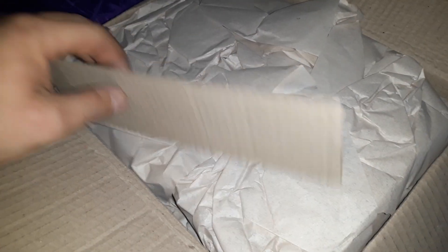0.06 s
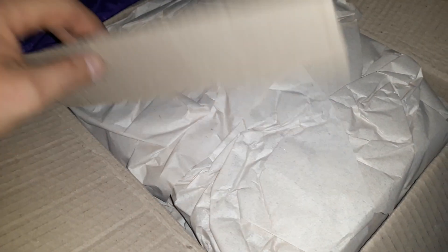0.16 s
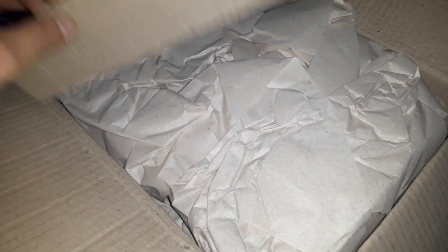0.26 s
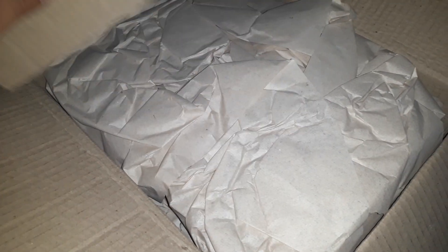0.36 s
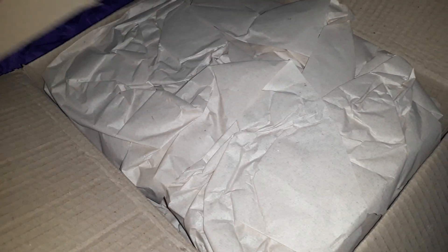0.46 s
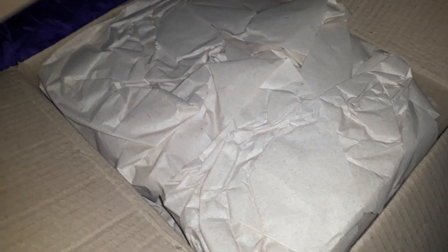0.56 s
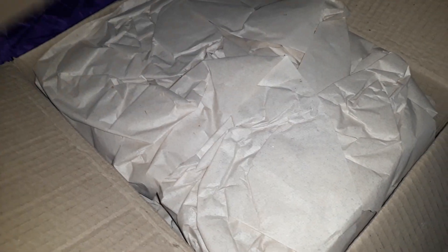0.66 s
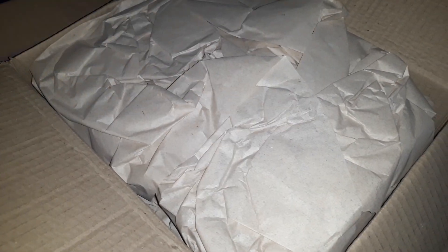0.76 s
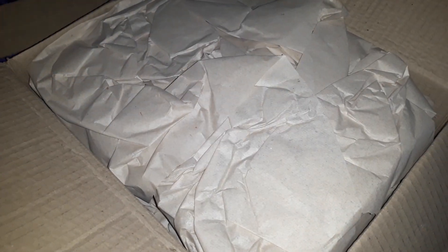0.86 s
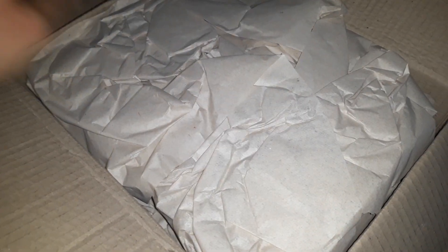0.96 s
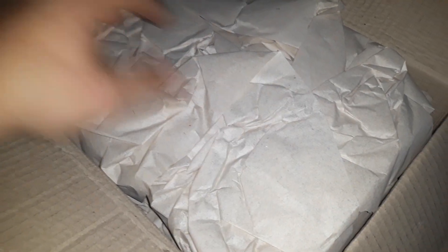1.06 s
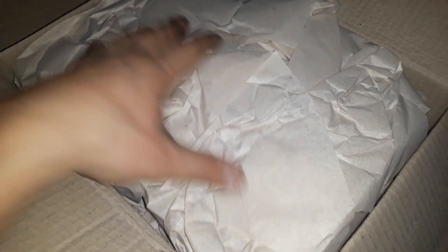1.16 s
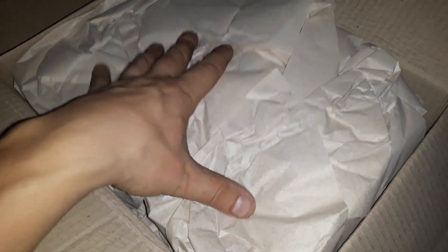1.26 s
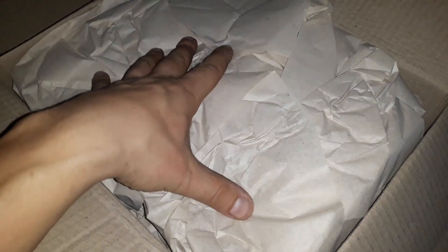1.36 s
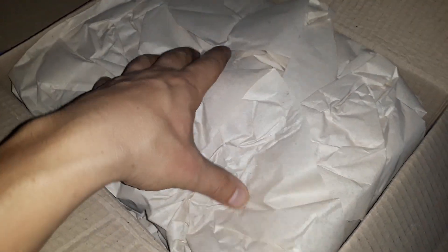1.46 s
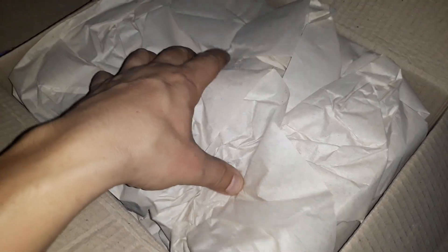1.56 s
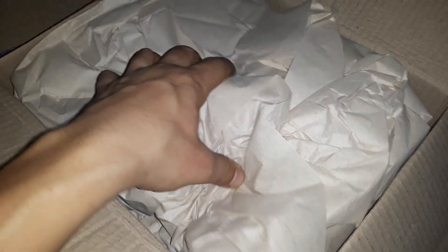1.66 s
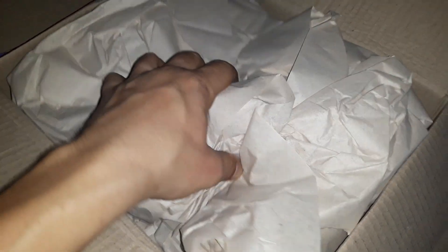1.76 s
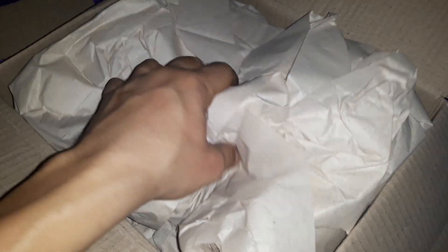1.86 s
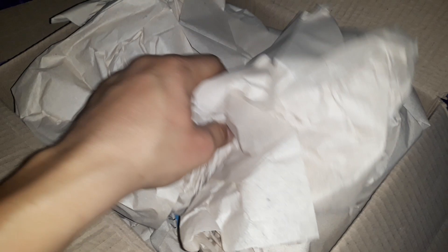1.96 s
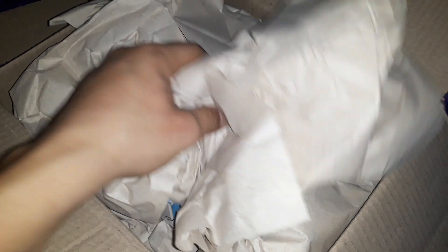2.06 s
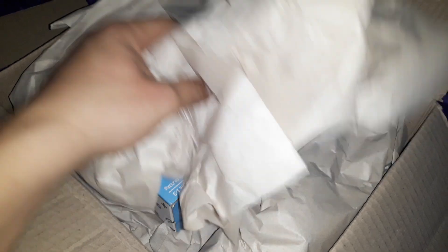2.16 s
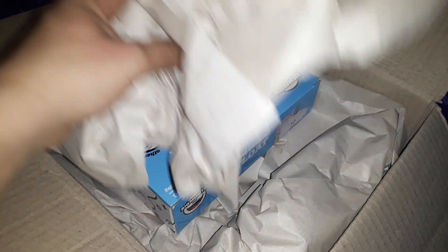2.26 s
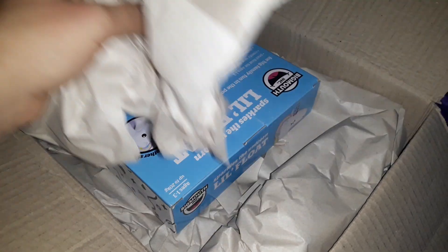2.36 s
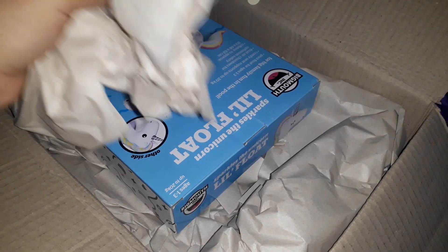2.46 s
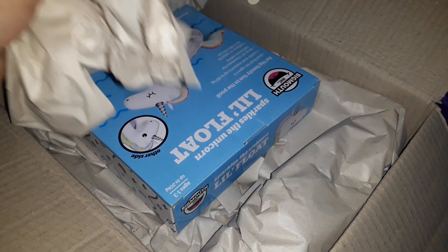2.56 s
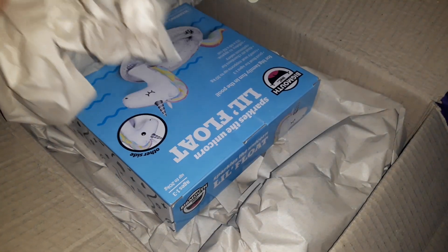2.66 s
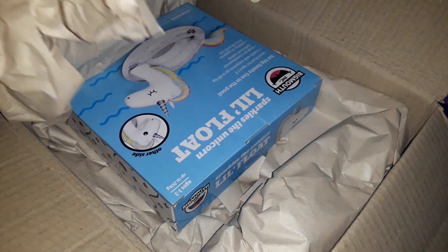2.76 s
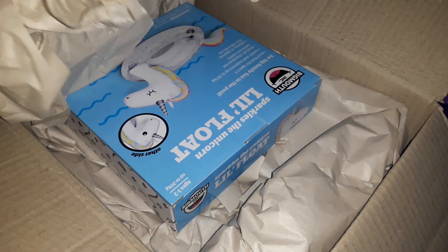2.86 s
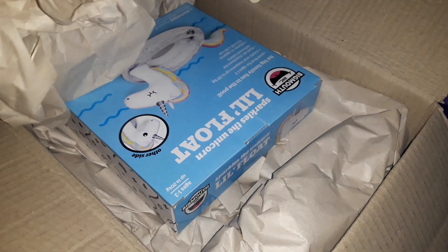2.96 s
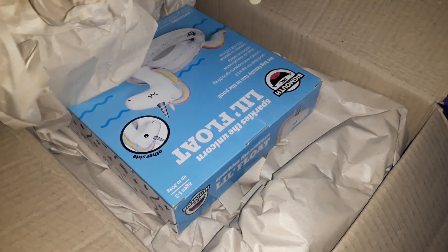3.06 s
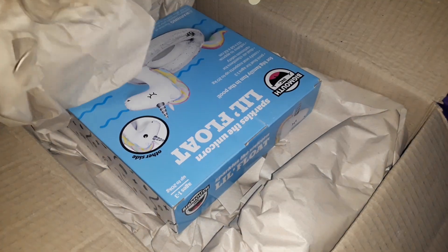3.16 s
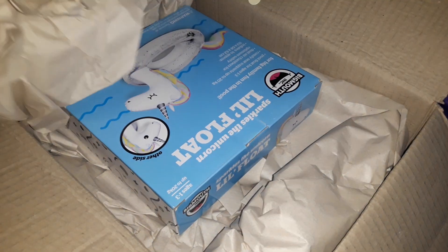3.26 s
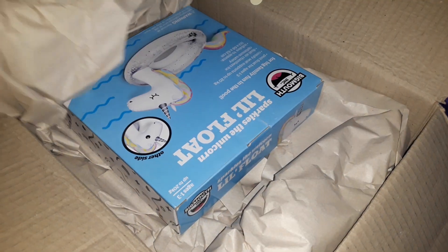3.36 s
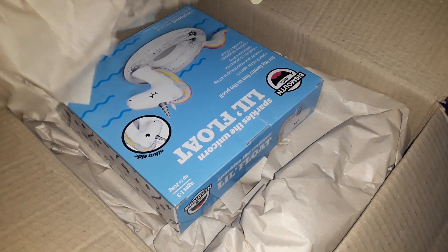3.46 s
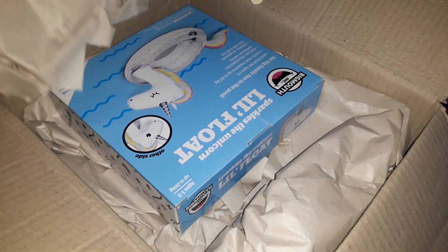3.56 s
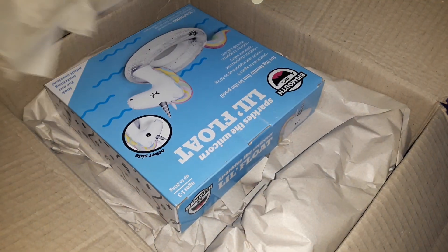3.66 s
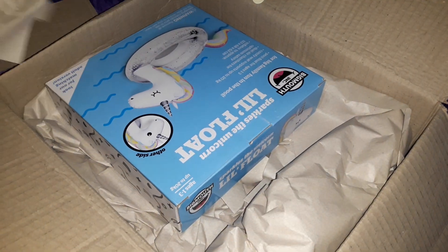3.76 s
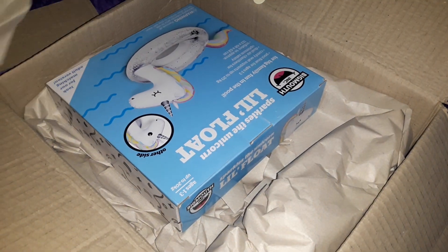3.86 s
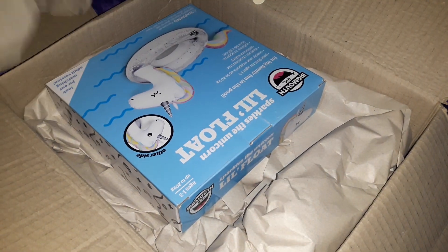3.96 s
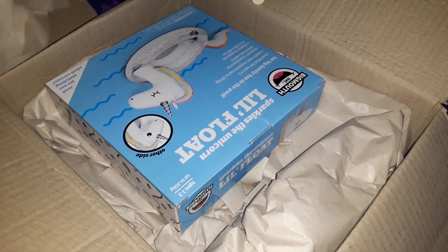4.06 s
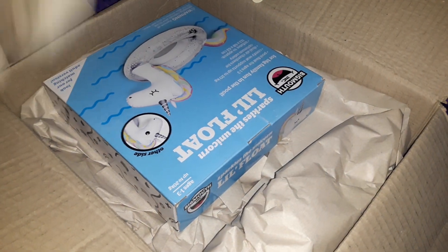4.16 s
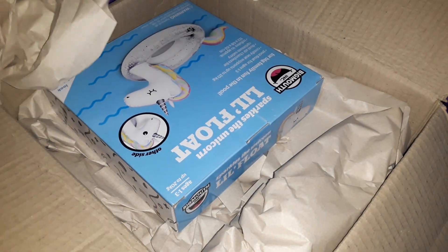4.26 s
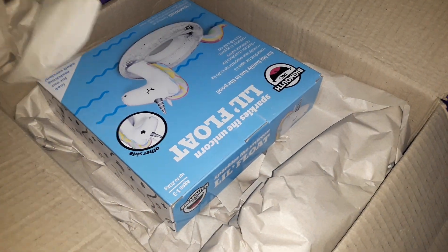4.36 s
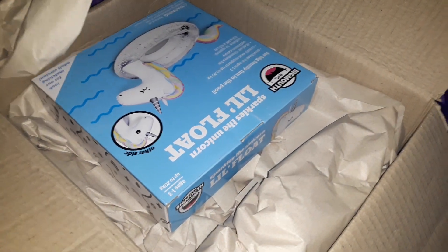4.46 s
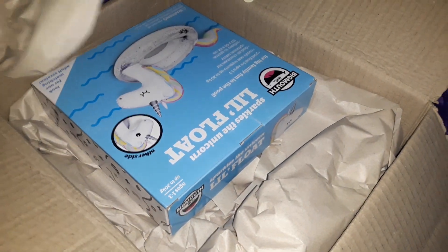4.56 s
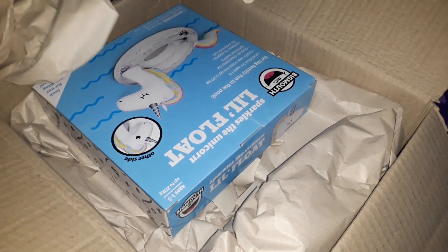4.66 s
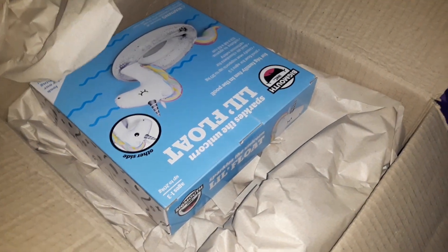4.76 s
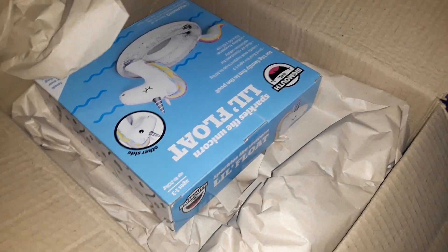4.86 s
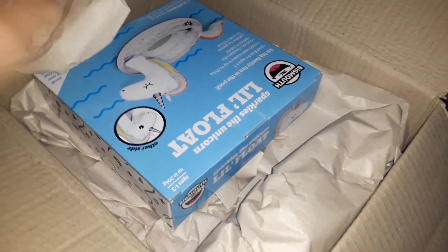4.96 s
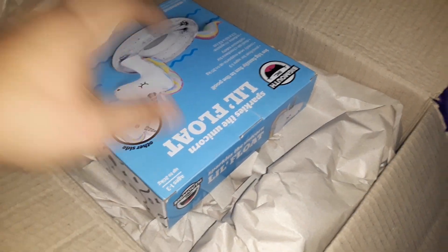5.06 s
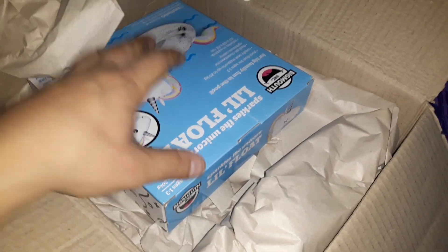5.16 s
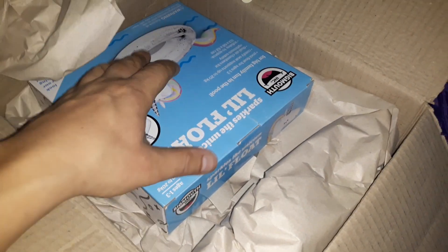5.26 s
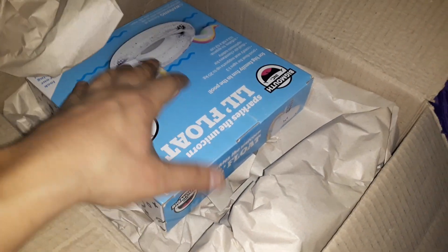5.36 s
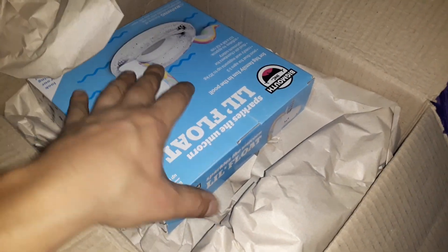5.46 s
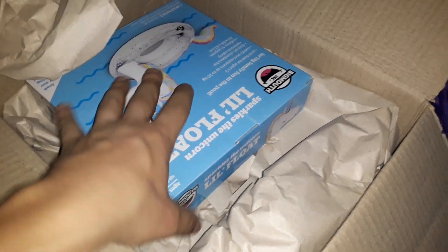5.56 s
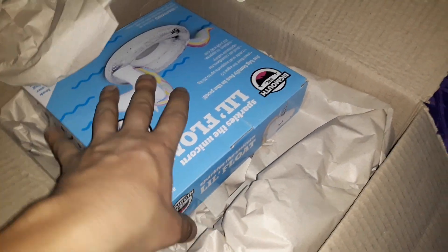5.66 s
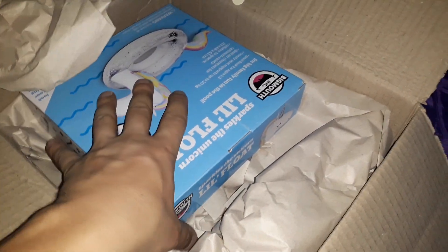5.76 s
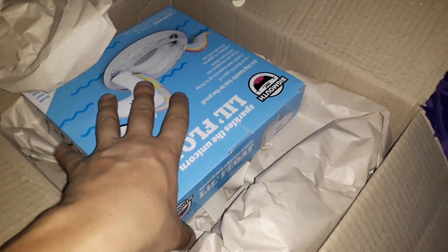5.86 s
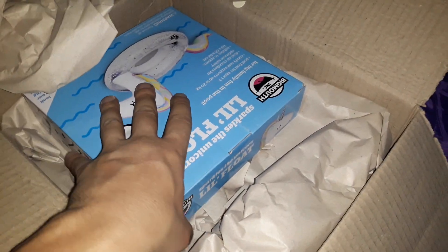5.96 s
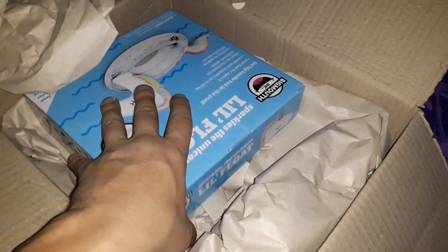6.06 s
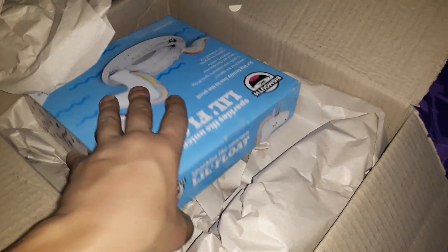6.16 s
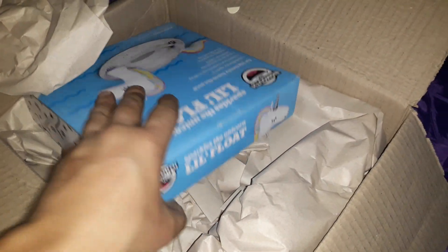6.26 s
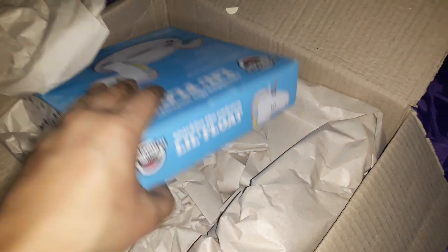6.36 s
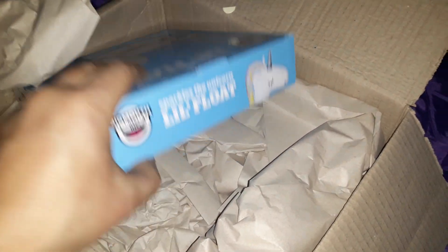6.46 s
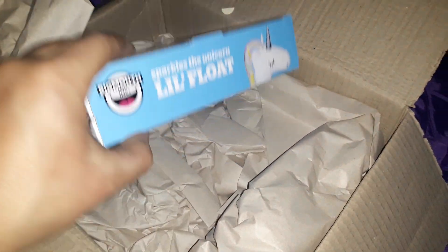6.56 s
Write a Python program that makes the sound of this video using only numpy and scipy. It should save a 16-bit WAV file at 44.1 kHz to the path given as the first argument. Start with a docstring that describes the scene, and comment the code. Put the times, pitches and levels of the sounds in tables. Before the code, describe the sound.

Close up in a small quiet room, a cardboard strip scrapes out of a box and lands with a hollow thud. After a pause, a hand crumples and pulls stiff packing paper in a long, loud rustle full of popping creases and dull box bumps. A last strong crunch fades, then fingers rub a carton softly and drag it out through the paper.

```python
"""Packing paper pulled from a cardboard box

Close microphone in a small room: crumpled paper is pushed aside and pulled out of a cardboard box.
Noise grains and short ticks make the creases buckle; rougher noise makes sheets slide and faces flap.
Single creases pop, the wad bumps and rubs the box, and a tossed strip lands on decaying modes.
At the end a carton is dragged out of the paper; a quiet background with a low hum lies behind it all."""
import sys
import numpy as np
from scipy import signal
from scipy.fft import rfft, irfft, next_fast_len
from scipy.io import wavfile
from scipy.ndimage import uniform_filter1d, map_coordinates

SR = 44100
rng = np.random.default_rng(int(sys.argv[2]) if len(sys.argv) > 2 else 0)


def digitize_waveform(pressure):
    """Quantize a signal to 16-bit integers and store it at the path in sys.argv[1].

    Rows of a 2-D input are taken as channels; values are limited to [-1, 1].
    """
    field = np.atleast_2d(pressure).T
    bounded = np.clip(field, -1, 1)
    quanta = np.round(bounded * 32767).astype(np.int16)
    wavfile.write(sys.argv[1], SR, quanta)


N = 291501  # length in samples

# separate strokes of the hand: the strip scrapes out, the paper springs back and settles, the hand
# presses in, the wad is shoved aside, fingers slide over the carton and tip it
# columns: surface, start_s, rise_s, hold_s, fade_t60_s, crinkle_db, flapping_rel_db, hiss_rel_db
HAND_STROKES = [("strip", 0, 0.0013, 0.025, 0.21, -41, -8, -2),
                ("strip", 0.045, 0.018, 0.082, 0.18, -39, -5.5, -2.7),
                ("paper", 0.14, .01, .02, 0.44, -49.5, -8.5, -4),
                ("settling paper", 0.23, .035, 0.044, 0.48, -55, -19, -4.5),
                ("settling paper", 0.455, 0.026, .01, 0.23, -64, -20, -2),
                ("settling paper", 0.587, 0.032, .04, .15, -66, -15, -0.89),
                ("paper", 1.2117, 0.034, 0.091, 0.36, -36, -7.5, -6),
                ("paper", 3.79, 0.021, 0.18, 0.33, -47.5, -6, -9.5),
                ("paper", 3.968, 0.18, 0.091, 0.79, -24, -6.5, -6),
                ("paper", 4.29, 0.06, 0.026, 0.54, -27, -6, -7.5),
                ("paper", 4.473, .13, 0.13, 0.73, -33, -7, -6.5),
                ("paper", 4.92, 0.048, 0.032, 0.13, -48.5, -7.5, -7),
                ("carton", 5.24, 0.033, 0.0091, 0.18, -50, -3, 3.02),
                ("carton", 5.41, 0.026, 0.046, 0.26, -48, -2.5, -5),
                ("carton", 5.615, 0.032, 0.056, 0.31, -46.5, -5.5, 0),
                ("carton", 5.77, 0.022, 0.042, .15, -47, -11, -14),
                ("carton", 5.9, 0.011, 0.1, .35, -47, -16, -10)]
# the wad gathered and pulled out in one long movement: time_s, crinkle_db
PULL_EFFORT = [(1.41, -46), (1.48, -30), (1.65, -31), (1.73, -25), (1.88, -28), (2.0, -23.5), (2.01, -28),
               (2.35, -35.5), (2.82, -38.5), (3.13, -31), (3.15, -35), (3.43, -32), (3.53, -28),
               (3.54, -35), (3.69, -34.5), (3.78, -45)]
# the carton dragged out of its bed of paper: time_s, crinkle_db
DRAG_EFFORT = [(5.27, -52.5), (5.56, -52.5), (5.87, -50), (6.08, -47), (6.2, -39), (6.35, -43.5),
               (6.46, -43.5), (6.59, -35)]
# the loudest creases snapping through: time_s, level_db, treble_rel_db
LOUD_SNAPS = [(0.0693, -24.5, 3), (0.15, -17, -5.0), (0.2768, -42, 3.0), (1.2805, -21.5, -7.0),
              (1.2883, -25, -2), (1.3261, -26, -2), (1.4756, -23, 2), (1.5515, -21.5, -1.5),
              (1.9034, -20, -8), (1.9927, -15.5, -11), (2.149, -21, -6.5), (2.2546, -23.0, -1),
              (2.3372, -23.5, 2.0), (2.4126, -30, 4.5), (2.4985, -26.5, -11), (2.6317, -23, -0.5),
              (2.6919, -20.0, -4), (2.9265, -22.5, -4.5), (2.9509, -20, -7.0), (3.0591, -20.5, -1.5),
              (3.108, -21, -13.5), (3.1764, -18.5, -7.5), (3.3061, -19, -12), (3.5238, -27, -6.5),
              (3.8878, -29, -10), (3.9438, -28, -8), (4.2294, -20, -7.0), (4.983, -33.5, -16),
              (5.0849, -38, -9), (5.1014, -46.5, -5), (5.1694, -43, -12), (5.2871, -37.5, -3.5),
              (5.4462, -31, -14.0), (5.4823, -31.5, -18), (5.6368, -34, -2.5), (5.6584, -27.5, -6.5),
              (5.6967, -33.0, -7.5), (5.7153, -21, -8.5), (5.748, -30, -13.0), (5.7806, -31.5, -12),
              (5.7863, -33, -0.5), (5.8298, -33, -13.5), (5.9092, -30.5, -4.5), (6.0583, -34, -7),
              (6.1231, -32, -1.5), (6.222, -31.5, 4.5), (6.3317, -31, -3.5), (6.357, -27.5, -9),
              (6.5246, -27, -1)]
# the wad and the fingers bumping cardboard: time_s, level_db
BOX_BUMPS = [(1.276, -39.5), (1.322, -38.5), (1.763, -35), (1.903, -29), (1.948, -26.5), (1.989, -31),
             (2.147, -29.5), (2.453, -37.5), (3.476, -36), (5.243, -50), (5.632, -44.5)]
# the wad rubbing over the box, which drones: start_s, rise_s, hold_s, level_db
BOX_RUBS = [(2.394, 0.039, 0.089, -43.5), (2.67, 0.031, 0.03, -44), (3.372, 0.048, 0.061, -40.5)]
# the tossed strip landing and settling: time_s, blow_db, slap_db
STRIP_LANDING = [(0.7827, -20.5, -44.5), (.7945, -27, -41.5), (0.837, -60, -44), (.886, -63.5, -51)]
# what the landing rings with: pitch_hz, rel_db, t60_s
LANDING_MODES = [(111, -15, 0.1), (188, -13, .08), (251, -1.5, 0.067), (284, 1.5, 0.11), (374, 4.5, 0.097),
                 (439, -11.5, 0.13), (530, -13.5, .07), (705, -9, 0.083), (823, -3, 0.084),
                 (940, -12, 0.18)]
# decay of the small room: pitch_hz, t60_s
ROOM_DECAY = [(150, 0.29), (1000, 0.21), (4000, 0.097), (14000, 0.37)]

# Spectra, all with columns pitch_hz, rel_db (per Hz; the filter sets the overall energy to 1).
# broad paper faces flapping
SHEET_FACE = [(29, -56.5), (50, -24), (125, -10.5), (245, -0.5), (321, -1.5), (356, -3), (414, -5),
              (511, -8), (754, -0.5), (1110, -3.5), (1550, -1.5), (1670, -1.5), (1800, -10), (2340, -12),
              (3960, -120)]
# creases and edges of the paper
PAPER_EDGE = [(710, -45), (1200, -15.5), (1680, -7.5), (2040, 0.5), (2620, -2.5), (3220, -8), (4260, -5),
              (7490, -11), (9820, -28), (11600, -23.5), (15200, -28), (16000, -22)]
# edges of the settling paper
SETTLING_PAPER_EDGE = [(710, -45), (1200, -15), (1730, -15), (2110, 0), (2590, -7), (2860, -16),
                       (5840, -3.5), (6370, -11.5), (9310, -22), (11900, -21), (16000, -27)]
# edges of the cardboard strip
STRIP_EDGE_SPECTRUM = [(710, -41), (1200, -7.5), (1470, -17), (1770, -5.5), (2830, -4.5), (3320, -9),
                       (4750, -5.5), (7820, -9), (9820, -26), (14700, -21.5), (16000, -23)]
# broad face of the carton
CARTON_FACE_SPECTRUM = [(29, -61), (50, -44), (87, -8), (129, -12.5), (249, 0), (542, -9.5), (743, -5),
                        (1290, -7), (1800, -3.5), (2340, -20), (3960, -120)]
# edges rubbed while the carton moves
CARTON_EDGE_SPECTRUM = [(710, -35), (1200, -25), (1700, -9), (2060, 1), (2650, -1.5), (3080, -5),
                        (4450, -5.5), (4960, -8.5), (7740, -12.5), (9930, -26.5), (15200, -21.5),
                        (16000, -32.5)]
# crack of a snapping crease
SNAP_CRACK = [(1200, -9.5), (2100, 8), (3200, 0.5), (4400, 5), (7500, -10), (9800, -20), (11700, -20),
              (16000, -24.5)]
# dull push of the landing strip
LANDING_PUSH = [(29, -65), (50, -26), (178, -15), (255, -2), (397, -5.5), (599, -8.5), (830, -2.5),
                (1130, -20), (1210, -27), (3000, -28), (3900, -73), (6600, -120)]
# quiet background
BACKGROUND_SPECTRUM = [(15, -37.5), (25, -6), (102, 7), (516, -16.5), (591, -14.5), (962, -10.5),
                       (1040, -10.5), (1130, -13.5), (1940, -20), (9070, -30.5), (14800, -27), (16000, -32)]
# light slap of the landing strip
LANDING_SLAP = [(500, -7.5), (2500, -4.0), (4000, -10.5), (8000, -11), (10000, -25.0), (16000, -16.5)]
# hollow resonance of the rubbed box
BOX_DRONE = [(140, -19), (210, -6), (248, 4.0), (300, -7.5), (400, -30)]
# cardboard panel when knocked
BOX_PANEL = [(70, -20.5), (115, -4), (175, 1.0), (245, -4.0), (300, 1), (370, 5.5), (470, -10), (900, -9)]
# low hum
HUM_SPECTRUM = [(55, -21), (80, -11.5), (94, 3.0), (110, -7.5), (150, -24.5)]

# relative to the crinkle, at the mean effort
PULL_FLAP_DB, PULL_HISS_DB = -7, -8.5
DRAG_FLAP_DB, DRAG_HISS_DB = -3.5, -7
# dB added to hiss and taken from flapping, per dB of effort
PULL_BRIGHTENS, DRAG_BRIGHTENS = 0.13, -0.064
GRAB_S, LET_GO_T60_S = 0.016, 0.21  # a long movement starts and dies away
STROKE_SLIDING, PULL_SLIDING, DRAG_SLIDING = 0.7, 0.55, 0.58  # sliding against buckling, 0-1
# lesser snaps fall at random, their level following the crinkle
STROKE_SNAP_DB, PULL_SNAP_DB, DRAG_SNAP_DB = -4, 0.5, 2.5  # over the crinkle
LESSER_SNAPS_PER_S, LESSER_SPREAD_DB = 13, 0.5
SNAP_TREBLE_DB, SNAP_TREBLE_SPREAD_DB = -5, 5.5
SNAP_DOUBLING_DB = 12  # a snap this much duller comes from a bigger fold and rings twice as long
RUB_FADE_T60_S = 0.42
TOP_HZ = 15950  # band limit of the recorder


def paper(moves):
    """Buckling and sliding together excite the creases, the broad sheets and the edges."""
    at, size_db = buckling(rate=850, spread_db=3, cluster_db=2.5)
    grip = unit(amp(0.42 * wobble(90)))  # sliding sheets catch and slip
    folds = grains(at, size_db, t60=0.006, scatter_db=2.5)
    tips = grains(at, size_db, t60=0.005, scatter_db=3)
    creases = unit(folds + 0.49 * facets(at, size_db, t60=0.011, low_hz=1418, high_hz=5210))
    sheets = unit(grains(at, size_db, t60=0.015, scatter_db=0.5))
    edges = unit(tips + 0.91 * facets(at, size_db, t60=0.0059, low_hz=4970, high_hz=14300))
    out = np.zeros(N)
    for (crinkle, flapping, hiss), sliding, _, face, edge in moves:
        def drive(crackle):
            """Mix buckling and fresh sliding noise by power."""
            rustle = grip * rng.standard_normal(N)
            return np.sqrt(1 - sliding) * crackle + np.sqrt(sliding) * rustle

        out += colour(crinkle * drive(creases), edge, low_hz=1480, high_hz=5070)
        out += colour(flapping * drive(sheets), face, high_hz=1670)
        out += colour(hiss * drive(edges), edge, low_hz=4940)
    return out


def buckling(rate, spread_db, cluster_db):
    """Random instants and sizes of giving creases: many small, few large, in clusters."""
    chance = rng.random((int(rate * N / SR), 2))
    at = (chance[:, 0] * N).astype(int)
    size_db = spread_db * np.minimum(-np.log(1 - chance[:, 1]), 3.2)  # capped exponential
    return at, size_db + cluster_db * wobble(55)[at]


def grains(at, size_db, t60, scatter_db):
    """Each crease shakes the paper for a moment, with its own strength in this band."""
    strength_db = size_db + scatter_db * rng.standard_normal(len(at))
    energy = np.bincount(at, amp(strength_db) ** 2, N)
    t = np.arange(SR // 20) / SR
    shape = amp(-60 * t / t60) * (1 - np.exp(-t / 0.00028))
    power = np.abs(signal.oaconvolve(energy, shape ** 2)[:N])
    return even(np.sqrt(power) * rng.standard_normal(N))


def facets(at, size_db, t60, low_hz, high_hz):
    """The flat facet beside each crease ticks briefly at a pitch of its own."""
    chance = rng.random((len(at), 2))
    hz = low_hz + (high_hz - low_hz) * chance[:, :1]
    life = t60 * (0.5 + chance[:, 1:])
    age = np.arange(SR // 100)  # samples
    decay = amp(size_db[:, None] - 60 * age / SR / life)
    ticks = decay * np.sin(2 * np.pi * hz * age / SR)
    return even(np.bincount((at[:, None] + age).ravel(), ticks.ravel(), N)[:N])


def even(crackle):
    """The hand feeds in energy steadily, and the creases of the moment share it."""
    return crackle / np.sqrt(np.abs(uniform_filter1d(crackle ** 2, SR // 14)) + 1e-9)


def movements():
    """Each kind of handling: (gains, share of sliding, lesser snaps dB, face spectrum, edge spectrum)."""
    pull = haul(PULL_EFFORT, PULL_FLAP_DB, PULL_HISS_DB, PULL_BRIGHTENS)
    drag = haul(DRAG_EFFORT, DRAG_FLAP_DB, DRAG_HISS_DB, DRAG_BRIGHTENS)
    return [(strokes("strip"), STROKE_SLIDING, STROKE_SNAP_DB, SHEET_FACE, STRIP_EDGE_SPECTRUM),
            (strokes("settling paper"), STROKE_SLIDING, STROKE_SNAP_DB, SHEET_FACE, SETTLING_PAPER_EDGE),
            (strokes("paper"), STROKE_SLIDING, STROKE_SNAP_DB, SHEET_FACE, PAPER_EDGE),
            (strokes("carton"), DRAG_SLIDING, DRAG_SNAP_DB, CARTON_FACE_SPECTRUM, CARTON_EDGE_SPECTRUM),
            (pull, PULL_SLIDING, PULL_SNAP_DB, SHEET_FACE, PAPER_EDGE),
            (drag, DRAG_SLIDING, DRAG_SNAP_DB, CARTON_FACE_SPECTRUM, CARTON_EDGE_SPECTRUM)]


def strokes(surface):
    """Gains of crinkle, flapping and hiss from all strokes over one surface, summed by power."""
    power = np.zeros((3, N))
    for rubbed, start, rise, hold, fade_t60, db, flap_db, hiss_db in HAND_STROKES:
        if rubbed == surface:
            gains = amp([[db], [db + flap_db], [db + hiss_db]])
            power += gains ** 2 * swell(start, rise, hold, fade_t60) ** 2
    return np.sqrt(power)


def haul(effort, flap_db, hiss_db, brightens):
    """Gains of crinkle, flapping and hiss in a long movement; effort sets both level and brightness."""
    s, db = np.transpose(effort)
    level = np.interp(np.arange(N) / SR, s, db)
    tilt = brightens * (level - db.mean())
    held = swell(s[0] - GRAB_S, GRAB_S, s[-1] - s[0], LET_GO_T60_S)
    return held * amp([level, level + flap_db - tilt, level + hiss_db + tilt])


def swell(start, rise, hold, fade_t60):
    """Gain of one stroke: it builds up, holds and dies away."""
    age = np.arange(N) / SR - start
    return np.clip(age / rise, 0, 1) * amp(-60 * np.maximum(age - rise - hold, 0) / fade_t60)


def snaps(moves):
    """A stiff crease pops and jolts its sheet, the duller the longer; the box wall throws the crack back."""
    body, treble = np.zeros(N), np.zeros(N)
    for s, db, treble_db in list(LOUD_SNAPS) + lesser_snaps(moves):
        length = 2 ** ((SNAP_TREBLE_DB - treble_db) / SNAP_DOUBLING_DB)
        jolt = pop(t60=0.0059 * length, tail_db=-8, tail_t60=0.012 * length)
        add(body, s, amp(db) / np.sqrt(length) * jolt)  # a longer jolt is spread thinner
        add(treble, s, amp(db + treble_db) * pop(t60=0.0049, tail_db=-9, tail_t60=0.013))
    crack = colour(body, SNAP_CRACK, low_hz=1490, high_hz=5130)
    crack += colour(treble, SNAP_CRACK, low_hz=5010)
    crack += amp(-13.5) * colour(body, SHEET_FACE, low_hz=480, high_hz=1590)
    add(crack, 0.0105, amp(-18.5) * crack)  # reflection off the box wall
    return crack


def lesser_snaps(moves):
    """Random snaps as rows (s, level dB, treble relative dB), as strong as the movement of the moment."""
    crinkle = np.linalg.norm([amp(snap_db) * gains[0] for gains, _, snap_db, *_ in moves], axis=0)
    at = rng.integers(N, size=int(LESSER_SNAPS_PER_S * N / SR))
    size, brightness = np.clip(rng.standard_normal((len(at), 2)).T, -2, 2)
    db = 20 * np.log10(crinkle[at] + 1e-9) + LESSER_SPREAD_DB * size
    treble_db = SNAP_TREBLE_DB + SNAP_TREBLE_SPREAD_DB * brightness
    return list(zip(at / SR, db, treble_db))


def pop(t60, tail_db, tail_t60):
    """A sharp crack followed by the weaker shiver of the sheet around it."""
    sound = np.zeros(SR // 20)
    add(sound, 0.0003, burst(t60, attack=0.00012))
    add(sound, 0.0008, amp(tail_db) * burst(tail_t60, attack=0.00085))
    return sound


def box():
    """The soft wad knocks against the cardboard, and rubs its hollow resonance into a drone."""
    knocks = np.zeros(N)
    for s, db in BOX_BUMPS:
        add(knocks, s, amp(db) * burst(t60=0.06, attack=0.0015))
    pressure = sum(amp(db) * swell(start, rise, hold, RUB_FADE_T60_S) for start, rise, hold, db in BOX_RUBS)
    rubbing = pressure * unit(amp(3.2 * wobble(30)) * rng.standard_normal(N))
    drone = colour(rubbing, BOX_DRONE, low_hz=121, high_hz=450)
    return colour(knocks, BOX_PANEL, low_hz=80, high_hz=1010) + drone


def landing():
    """A hollow thud with a light slap; something nearby rings on faintly, with a slow beat."""
    ring, push, slap = np.zeros((3, N))
    t = np.arange(SR) / SR
    for s, db, slap_db in STRIP_LANDING:
        modes = np.zeros(SR)
        for hz, level, t60 in LANDING_MODES:
            decay = amp(level + rng.normal(0, 1) - 60 * t / t60)  # each blow excites the modes anew
            modes += decay * np.sin(2 * np.pi * hz * t)
        add(ring, s, amp(db - 4.5) * modes * (1 - np.exp(-t / 0.00046)))
        add(push, s, amp(db) * burst(t60=0.051, attack=0.00044))
        add(slap, s - 0.002, amp(slap_db) * burst(t60=0.16, attack=0.00085))
    pair = np.sin(2 * np.pi * 1049 * t) + 0.3 * np.sin(2 * np.pi * 1054.5 * t)  # beats
    add(ring, STRIP_LANDING[0][0], amp(-65 - 60 * t / 2.6) * pair)
    ring = signal.sosfilt(signal.butter(4, 85, "high", fs=SR, output="sos"), ring)
    return ring + colour(push, LANDING_PUSH, low_hz=80) + colour(slap, LANDING_SLAP, low_hz=300)


def room(x):
    """The small room's tail of decaying noise, renewed as the source moves about."""
    wet, hop = np.zeros(N), SR // 3
    for start in range(0, N, hop):
        hz, age, z = signal.stft(rng.standard_normal(SR // 2), SR, nperseg=256)
        decay = amp(-60 * age / along(ROOM_DECAY, hz)[:, None])  # each band at its own rate
        tail = signal.istft(z * decay, SR, nperseg=256)[1]
        reverb = signal.fftconvolve(x[start:start + hop], tail / np.linalg.norm(tail))
        add(wet, start / SR + 0.005, reverb)
    return wet


def background():
    """Steady quiet noise, shaped by its spectrum."""
    return amp(-67.5) * colour(rng.standard_normal(N), BACKGROUND_SPECTRUM)


def hum():
    """A low hum: noise in a narrow band around 94 Hz."""
    return amp(-74.5) * colour(rng.standard_normal(N), HUM_SPECTRUM, high_hz=158.7)


def burst(t60, attack):
    """Noise that swells and dies away, its rms peaking near 1."""
    t = np.arange(SR // 6) / SR
    shape = amp(-60 * t / t60) * (1 - np.exp(-t / attack))
    noise = unit(shape * rng.standard_normal(len(t)))
    return noise * np.sqrt(np.mean(shape ** 2)) / shape.max()


def colour(x, spectrum, low_hz=10, high_hz=20000, size=4096):
    """Causal filter of unit energy with the given spectrum between two soft edges."""
    hz = np.fft.rfftfreq(size, 1 / SR)
    edges = (1 + (low_hz / (hz + 1)) ** 12) * (1 + (hz / high_hz) ** 12)
    # folding the cepstrum gives minimum phase: no sound ahead of its cause
    cepstrum = irfft(np.log(amp(along(spectrum, hz)) / np.sqrt(edges) + 1e-6))
    cepstrum[1:size // 2] *= 2
    cepstrum[size // 2 + 1:] = 0
    response = irfft(np.exp(rfft(cepstrum)))
    return signal.oaconvolve(x, response / np.linalg.norm(response))[:N]


def wobble(rate):
    """A random curve of straight lines between rate knots a second."""
    knots = rng.standard_normal(int(N * rate / SR) + 4)
    return map_coordinates(knots, [np.arange(N) * rate / SR], order=1)


def along(points, hz):
    """Read (Hz, value) points on a log axis."""
    f, v = np.transpose(points)
    return np.interp(np.log(hz + 1), np.log(f), v)


def add(track, s, sound):
    """Mix a sound into the track at time s."""
    start = max(round(s * SR), 0)
    track[start:start + len(sound)] += sound[:max(len(track) - start, 0)]


def amp(db):
    """Decibels to gain."""
    return 10 ** (np.asarray(db) / 20)


def unit(x):
    """Scale to rms 1."""
    return x / np.sqrt(np.mean(x ** 2) + 1e-20)


def scene():
    """Near paper and the farther thud in the room, over a quiet background with a low hum."""
    moves = movements()
    near = paper(moves) + snaps(moves) + box()
    thud = landing()
    reverb = room(amp(-14.0) * near + amp(-7.5) * thud)  # the farther source stirs more of the room
    return (near + thud + reverb + background() + hum())[None]


def record(dry):
    """The recorder keeps nothing above its band limit."""
    size = next_fast_len(N + SR // 2)
    kept = np.fft.rfftfreq(size, 1 / SR) < TOP_HZ
    return irfft(rfft(dry, size) * kept, size)[:, :N]


dry = scene()
out = record(dry)
digitize_waveform(out)
```